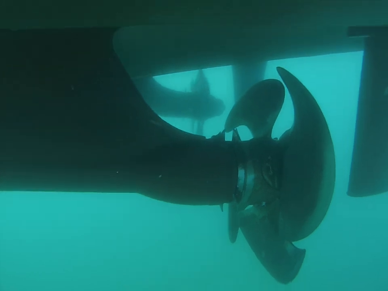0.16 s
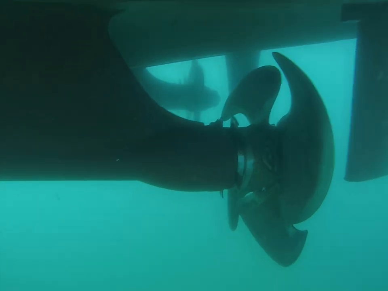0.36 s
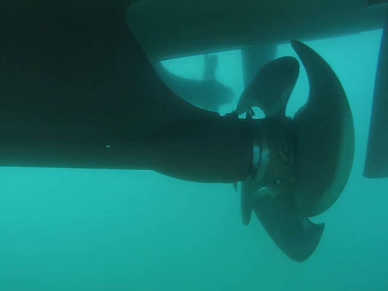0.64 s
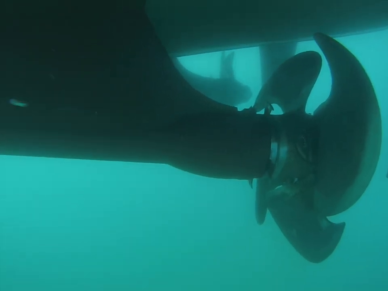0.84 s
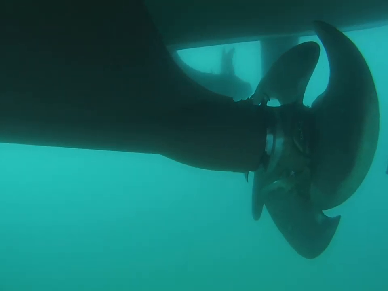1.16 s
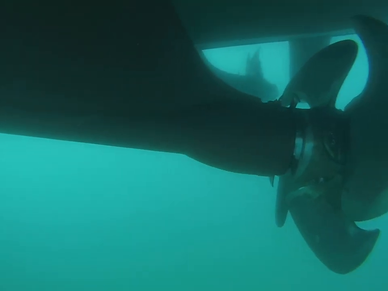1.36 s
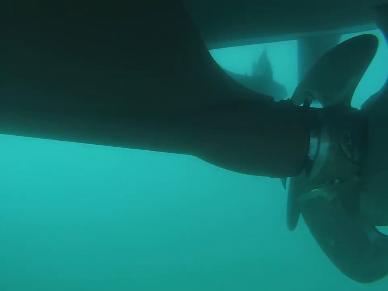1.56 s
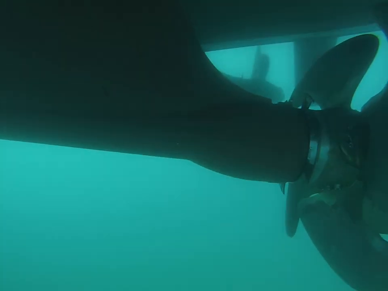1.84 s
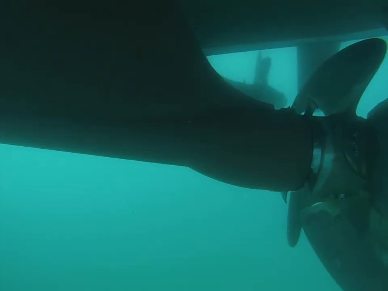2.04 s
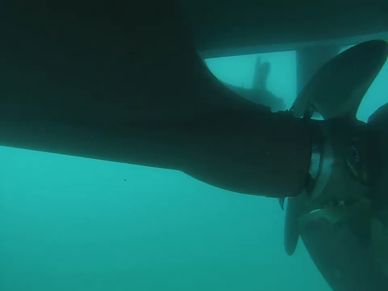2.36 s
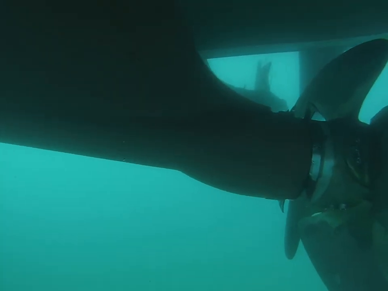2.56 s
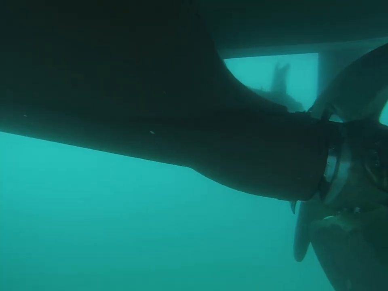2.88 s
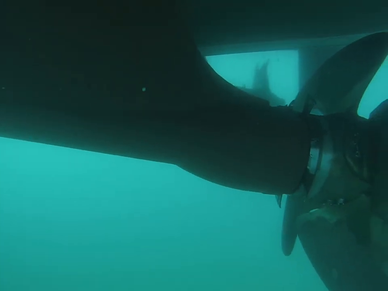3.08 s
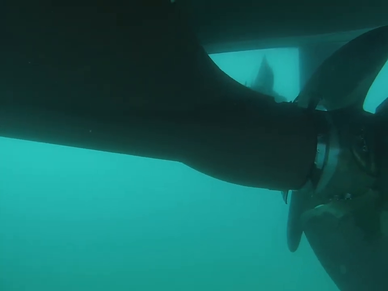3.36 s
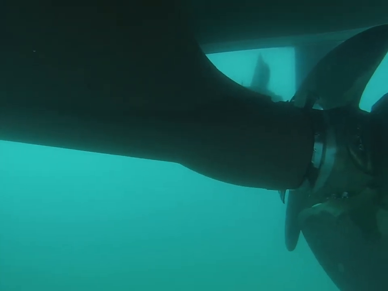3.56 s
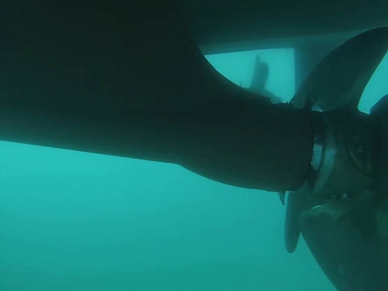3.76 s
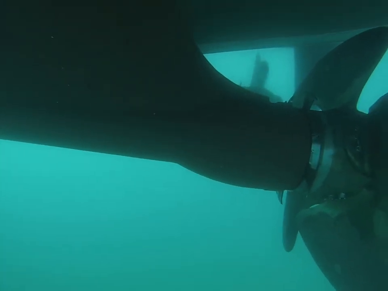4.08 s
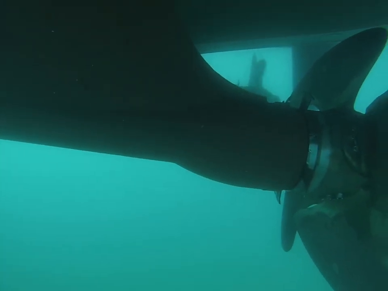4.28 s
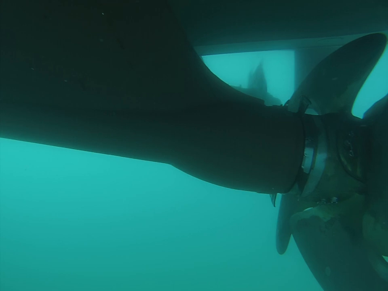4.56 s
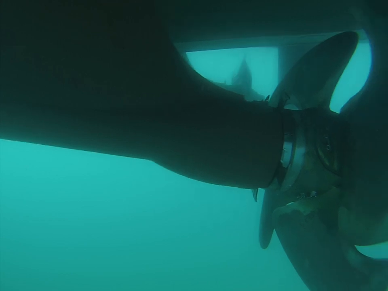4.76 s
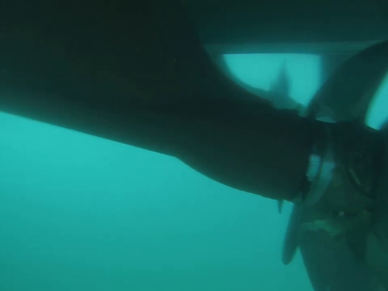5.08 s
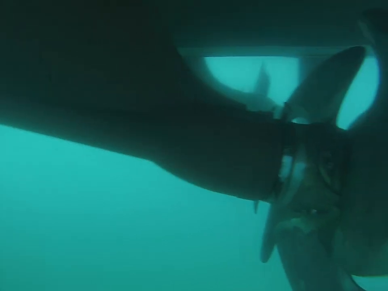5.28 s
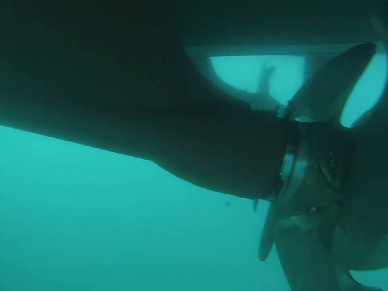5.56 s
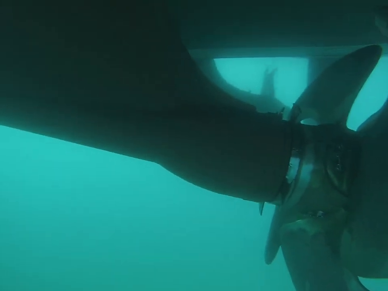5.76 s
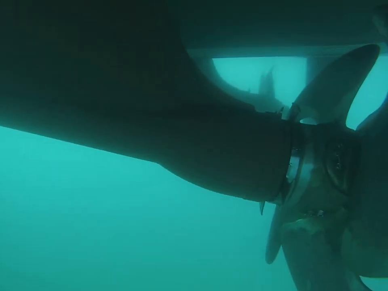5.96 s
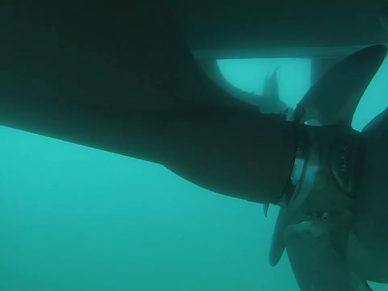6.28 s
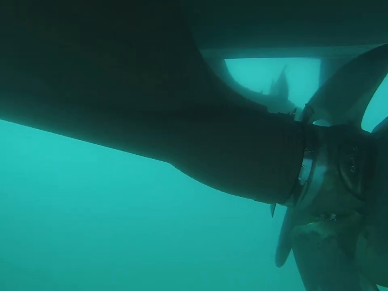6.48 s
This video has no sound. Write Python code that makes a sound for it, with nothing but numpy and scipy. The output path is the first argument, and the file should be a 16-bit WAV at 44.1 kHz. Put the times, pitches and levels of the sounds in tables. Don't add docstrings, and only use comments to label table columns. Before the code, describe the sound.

A ship's engine idles under water, heard very close through a sealed microphone housing. Hard metallic knocks come roughly sixteen per second from start to end, slightly uneven, some crisp ticks, others heavier, dragging clatter. Below them run a deep shaft hum, wobbling gear tones and a surging hull rumble. Small bumps sound near 0.1 and 0.4 s, with two tiny bubble blips around 0.2 to 0.3 s; beats weaken at 0.2 and 0.6 s. The clatter grows closer after 1 s. At 2.3 s sharp snaps and a booming bump overload the microphone; the biggest thump, at 2.65 s, makes the engine sink and climb back. More thumps hit at 3.4 to 3.6 s, softer ones from 4.6 s, sharper cracks at 4.8 to 5.4 s. Plate rattle and faint pump whine increase after 2.7 s. From 5.5 to 6.6 s the knocking drone continues without bumps and cuts off.

```python
import sys
import numpy as np
from scipy import signal
from scipy.io import wavfile
from scipy.ndimage import uniform_filter1d

SR = 44100
rng = np.random.default_rng(int(sys.argv[2]) if len(sys.argv) > 2 else 0)


def persist_wave(psi):
    counts = np.round(np.clip(psi, -1, 1) * 32767).astype(np.int16)
    wavfile.write(sys.argv[1], SR, np.atleast_2d(counts).T)


def undo_db(level):
    steps = np.asarray(level, float) / 20
    return 10 ** steps


N = 292383

# (time [s], closeness [dB], turn from engine room to stern plate [0-1], hum level [dB])
DRIFT = [(0, -4.5, 0.36, -27.5), (.35, -6, 0.1, -26), (.7, -3, 0, -25), (1.0, -1.2, 0, -28.5),
         (1.4, 0.3, 0.18, -28.5), (2.2, -0.6, 0.25, -26.5), (2.75, 2.5, 1, -29.5), (3.1, -0.4, 1, -28),
         (3.5, -1.2, 1, -31), (3.9, -0.1, 0.78, -28), (4.6, -1, 1, -28.5), (5.3, 0.8, 0.94, -29),
         (5.8, .3, 0.75, -27.5), (6.63, 1.7, 1, -27.5)]
# (frequency [Hz], level [dB])
HUM_LINES = [(74.9, 0), (182.3, -11.5), (30, -13.5)]
# (frequency [Hz], level [dB])
GEAR_LINES = [(140, -3.5), (233, -2.5), (280, 1.5), (372, -10.5), (1085, -28)]
# (time [s], level [dB])
GEAR_LOAD = [(0, -31), (.35, -34.5), (.7, -26), (1.05, -33.5), (1.8, -32.5), (2.3, -31), (3.5, -35),
             (4.1, -34), (4.7, -40.5), (5.3, -31.5), (5.8, -36.5), (6.63, -37)]
# (frequency [Hz], density [dB per Hz])
RUMBLE_SPECTRUM = [(8.8, -43), (15, -11), (77, -3), (119, -7.5), (180, -8.5), (279, -7), (344, -13),
                   (619, -19), (855, -74), (1180, -29), (1400, -24), (1820, -54), (3080, -120)]
# (time [s], frequency [Hz], peak level [dB])
BUBBLES = [
    (0.22, 1475, -24),
    (0.323, 1220, -25),
]
# (time [s], peak [dB], ring [Hz], crack under the peak [dB], crack [Hz])
BUMPS = [(0.0898, -16.5, 142, -30, 796), (0.3761, -17, 223, -29, 790), (0.3801, -9.5, 155, -30, 790),
         (2.2746, 2.5, 133, -2, 1115), (2.341, -2.5, 142, -6, 544), (2.6546, 9.5, 154, -14.5, 850),
         (2.7, -1.5, 190, -18, 700), (3.3986, 5.5, 140, -4.5, 806), (3.5641, 2, 161, -2.3, 753),
         (3.6430, -7.5, 169, -16.5, 704), (4.5574, -18, 168, -10, 700), (4.615, -19, 150, -20, 700),
         (4.663, -17.5, 177, -22, 700), (4.6822, -8, 181, -26, 700), (4.834, -6, 130, -7, 1060),
         (4.979, -3.5, 130, -12, 1050), (5.2270, 0.3, 162, -0.5, 780), (5.3170, -1, 155, -7, 790),
         (5.425, -7.5, 169, -11, 800)]
# (time [s], frequency [Hz], peak level [dB])
SNAPS = [
    (2.2741, 1600, -5.5),
    (2.3383, 920, -3),
    (4.8312, 835, -14),
    (4.8315, 1520, -11.5),
    (4.9782, 900, -11.5),
    (4.9792, 1490, -6),
]
# (frequency [Hz], width [Hz], level [dB])
CLATTER_MODES = [(1436, 56, -24), (1662.5, 177, 3), (2113, 247, 2.5), (2225, 90, -2)]
# (frequency [Hz], width [Hz], level [dB])
TICK_MODES = [(2308, 264, -4.5), (3362, 137, -2.5), (3591, 322, 0.5), (3930, 125, -7.5), (5330, 660, -12.5),
              (6880, 1110, -13), (8770, 650, -35), (9570, 430, -20.5), (10250, 1080, -19),
              (11700, 730, -30.5), (12800, 500, -34)]
# (frequency [Hz], width [Hz])
HOUSING_NULLS = [(2800, 210), (4650, 480), (7900, 2090), (8850, 450), (12150, 300)]
# (time [s], lateness [ms])
HUNT = [(0, 1.5), (.8, 1), (1.3, 0), (2.2, -2), (2.9, -2), (3.3, 0.5), (4.3, 2), (4.8, 1), (5.6, -1),
        (6.1, -3.5), (6.63, 0)]
# (time [s], level change [dB])
WEAK = [(.2217, -35), (.6145, -42), (2.715, -1), (2.7774, -6), (2.9043, -5.5), (3.678, -1), (4.189, -36),
        (4.763, -3), (4.8903, -5.5), (5.276, -7), (5.9737, -8)]
# (time [s], clatter gain [dB])
SLAPS = [(0.5478, 6), (0.6752, 13.5), (1.1228, -0.5), (1.4382, 9), (1.95, 10.5), (2.076, 8.5), (2.2678, 1),
         (2.5908, 2), (2.9741, 10), (3.1018, 7.5), (3.2297, 11), (3.8681, 6.5), (3.9969, 9), (4.2537, 10.5),
         (4.3192, 4.5), (5.595, 10), (5.722, 5.5), (5.7856, 10.5), (5.912, 0.5), (6.2298, 0.5), (6.2962, 9),
         (6.489, 5.5), (6.615, 3)]
# (time [s], tick gain [dB])
CRISP = [(.1649, 5), (.292, 2.5), (.3561, 2.5), (.4827, 4.5), (.7369, 3.5), (.803, 1), (.8659, 1),
         (.93, 4.5), (1.0576, 5), (1.2485, 6.5), (1.5033, 4.5), (1.568, 4.5), (1.7583, 4.5), (1.8225, 4.5),
         (3.1663, 3), (3.2935, 3.5), (3.5495, 4), (4.3824, 6.5), (5.8482, 1.5), (6.1685, 0.5),
         (6.4232, 4.5)]
# (time [s], lag [ms])
DRAGS = [(0.9923, 19), (1.3108, 13.6), (1.3747, 20), (2.205, 22), (3.0345, 14), (3.356, 18), (3.8044, 11),
         (4.444, 17), (4.508, 12), (4.6347, 11), (5.146, 10), (5.6561, 19)]


def unit(x):
    return x / np.sqrt(np.mean(x ** 2))


def band(x, hz, width):
    return signal.lfilter(*signal.iirpeak(hz, hz / width, fs=SR), x)


def ring(x, modes):
    steep = [undo_db(db) * band(band(x, hz, width), hz, 2.38 * width) for hz, width, db in modes]
    power = sum(undo_db(2 * db) * width for _, width, db in modes) * np.pi / SR
    return sum(steep) / np.sqrt(power)


def walk(rate):
    hold = int(SR / rate)
    steps = np.repeat(rng.standard_normal(N // hold + 1), hold)
    return unit(uniform_filter1d(uniform_filter1d(steps, hold), hold)[:N])


def add(track, s, sound):
    i = int(s * SR)
    track[i:i + len(sound)] += sound[:N - i]


def over_time(table):
    return np.interp(np.arange(N) / SR, *np.transpose(table))


def drift_db(base, per_close, per_turn):
    s, close_db, turn, _ = np.transpose(DRIFT)
    return np.interp(np.arange(N) / SR, s, base + per_close * close_db + per_turn * turn)


def gain_control():
    threshold_db, grab_s, recover_s = -21.5, 0.0042, 0.058
    charge, drain = np.zeros(N), np.exp(-np.arange(SR) / SR / recover_s)
    for s, db, *_ in BUMPS:
        start = int((s + .004) * SR)
        after = slice(start, start + SR)
        charge[after] = np.maximum(charge[after], (undo_db(db - threshold_db) - 1) * drain)
    grab = np.exp(-1 / (grab_s * SR))
    return 1 / (1 + signal.lfilter([1 - grab], [1, -grab], charge))


def tones(lines, wobble_hz, flutter_db):
    out = np.zeros(N)
    for hz, db in lines:
        level = undo_db(db + flutter_db * walk(14))
        out += level * np.sin(2 * np.pi * np.cumsum(hz + wobble_hz * walk(6)) / SR)
    return unit(out)


def shaft_hum():
    s, _, _, hum_db = np.transpose(DRIFT)
    level = undo_db(np.interp(np.arange(N) / SR, s, hum_db))
    return level * tones(HUM_LINES, wobble_hz=1.19, flutter_db=1.5)


def gears():
    return undo_db(over_time(GEAR_LOAD)) * tones(GEAR_LINES, wobble_hz=6.0, flutter_db=4.5)


def rumble():
    hz_at, db_at = np.transpose(RUMBLE_SPECTRUM)
    out, surge = 0, walk(25)
    for hz in 18 * 2 ** np.arange(0, 6.2, 1 / 3):
        db = np.interp(np.log(hz), np.log(hz_at), db_at) + 2.0 * surge + 1.3 * walk(9)
        out = out + undo_db(db) * band(band(rng.standard_normal(N), hz, hz / 3), hz, hz / 2)
    stir = 0.076
    return undo_db(drift_db(-28, 0.35, 2.2)) * unit(out) / gain_control() ** stir


def plate():
    rattle = unit(ring(rng.standard_normal(N) * undo_db(2.3 * walk(50)), [(1375, 150, 0)]))
    whine = tones([(715, 0)], wobble_hz=1.95, flutter_db=0.0)
    return undo_db(drift_db(-50.5, 0.47, 8.3)) * rattle + undo_db(drift_db(-60.5, 0.19, 11.6)) * whine


def bubbles():
    out, t = np.zeros(N), np.arange(3500) / SR
    for s, hz, db in BUBBLES:
        envelope = (1 - np.exp(-t / 0.0026)) * np.exp(-t / 0.0055)
        add(out, s, undo_db(db + 3) * np.sin(2 * np.pi * hz * (t + 2.0 * t ** 2)) * envelope)
    return out


def add_crack(track, s, hz, db):
    t = np.arange(3500) / SR
    add(track, s - .5 / hz, -undo_db(db) * np.sin(2 * np.pi * hz * t) * np.exp(-t / 0.0021))


def latch():
    out, t = np.zeros(N), np.arange(3500) / SR
    for s, hz, db in SNAPS:
        add_crack(out, s, hz, db)
    add(out, 2.340, undo_db(-14) * np.sin(2 * np.pi * 900 * t) * np.exp(-t / 0.012))
    return out


def bumps():
    out, t = np.zeros(N), np.arange(3500) / SR
    shell = 0.3 * np.sin(2 * np.pi * 205 * t) * (1 - np.exp(-(t / 0.007) ** 2)) * np.exp(-t / 0.022)
    for s, db, hz, crack_db, crack_hz in BUMPS:
        sharp = np.clip(crack_hz / 300 - 8 / 3, 0, 1)
        sag = (.25 + .45 * sharp) * (1 - np.exp(-t / (.0015 + .0015 * sharp)))
        envelope = np.exp(-(t / 0.0094) ** 2) * (1 - np.exp(-t / 0.00024))
        swing = np.sin(2 * np.pi * (hz * t + sag)) * envelope
        add(out, s, undo_db(db) * (swing + shell))
        add_crack(out, s, crack_hz, db + crack_db)
    return out


def firings():
    first_s, period_s = .0342, .0639
    beat = np.arange(first_s, N / SR, period_s)
    chance = rng.standard_normal((len(beat), 4)).T
    uneven_ms = .6 * (-1) ** np.arange(len(beat))
    late_ms = np.interp(beat, *np.transpose(HUNT)) + uneven_ms + .7 * chance[0]
    s = beat + late_ms / 1000
    tick, clatter = 0.73 * chance[1], 0.5 * chance[2]
    lag = 6.26 * np.exp(0.41 * chance[3])

    def place(when):
        return round((when - first_s) / period_s)

    for when, lag_ms in DRAGS:
        s[place(when)], lag[place(when)] = when, lag_ms
    for rows, to_tick, to_clatter in (WEAK, 1, 1), (CRISP, 1, -0.96), (SLAPS, -0.11, 1):
        for when, db in rows:
            i = place(when)
            s[i], tick[i], clatter[i] = when, to_tick * db, to_clatter * db
    lag[[place(when) for when, _ in SLAPS]] = 3.8
    i = (s * SR).astype(int)
    tick_db = -15 + drift_db(.1, 0.11, -6.5)[i] + tick
    clatter_db = -18 + drift_db(.1, 1.35, 0.12)[i] + clatter
    return np.transpose([s, tick_db, clatter_db, lag])


def knocks():
    strike, tick, clatter, thud = np.zeros((4, N))
    t = np.arange(2600) / SR
    rows = firings()
    tail_db = drift_db(-3, 0.18, 3.3)
    chance = rng.standard_normal((len(rows), 2))
    for (s, tick_db, clatter_db, lag_ms), (tail, low) in zip(rows, chance):
        i = int(s * SR)
        strike[i] = undo_db(tick_db + 9.5 - 3.7 * tail)
        rattle = undo_db(-4.5 + tail_db[i] + 2.6 * tail) * np.exp(-t / 0.0069)
        onset = 1 - np.exp(-t / 0.00011)
        add(tick, s, undo_db(tick_db - 4.0) * onset * (np.exp(-t / 0.0015) + rattle))
        peak = np.clip(lag_ms / 1000, .0015, .03)
        add(tick, s + peak, undo_db(clatter_db - 16 + 2.0 * tail) * np.exp(-t / 0.0013))
        rise = undo_db(-5.5) + (1 - undo_db(-2.0)) * np.clip(t / peak, 0, 1) ** 2
        fall = np.exp(-np.maximum(t - peak, 0) / 0.0039)
        add(clatter, s, undo_db(clatter_db - 3.5) * rise * fall)
        add(thud, s, undo_db(-27.5 + 0.57 * low) * np.exp(-t / 0.0021))
    grains = rng.exponential(size=(3, N // 40 + 1)).repeat(40, axis=1)[:, :N]
    grit = rng.standard_normal((3, N)) * undo_db(1.3 * grains - 1.5)
    strike = strike * undo_db(drift_db(4.3, -0.22, -3.5))
    hiss_bed = undo_db(drift_db(-39, 0.46, -5) + 2.3 * walk(90))
    clatter_bed = undo_db(drift_db(-33.5, 1.2, 0.093) + 1.5 * walk(60))
    bright = ring(strike + grit[0] * (tick + hiss_bed), TICK_MODES)
    steel = ring(0.31 * strike + grit[1] * (clatter + clatter_bed), CLATTER_MODES)
    sheen = undo_db(drift_db(-3, -0.61, 8.1)) - 1
    bright = bright + sheen * (band(bright, 6700.0, 1900.0) + band(bright, 10800.0, 3200.0))
    for hz, width in HOUSING_NULLS:
        bright = bright - 0.98 * band(bright, hz, width)
    wall = signal.butter(4, [1100, 12000], "bandpass", fs=SR, output="sos")
    return signal.sosfilt(wall, bright + steel) + ring(grit[2] * thud, [(464, 147, 0)])


def scene():
    background = shaft_hum() + gears() + rumble() + plate()
    handling = bubbles() + latch() + bumps()
    return (background + handling + knocks())[None]


def low_pass(x):
    return signal.sosfilt(signal.butter(12, 15310, fs=SR, output="sos"), x)


def record(dry):
    ceiling = .415
    loud = dry * gain_control() / ceiling
    flat = ceiling * loud / (1 + np.abs(loud) ** 10) ** (1 / 10)
    roll_off = signal.butter(3, 13600, fs=SR, output="sos")
    return low_pass(signal.sosfilt(roll_off, flat))


dry = scene()
out = record(dry)
persist_wave(out)
```